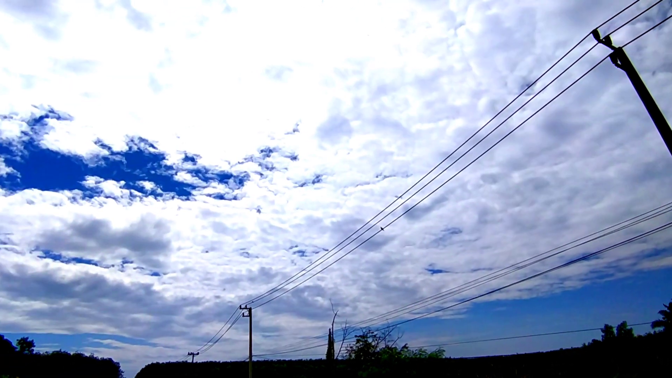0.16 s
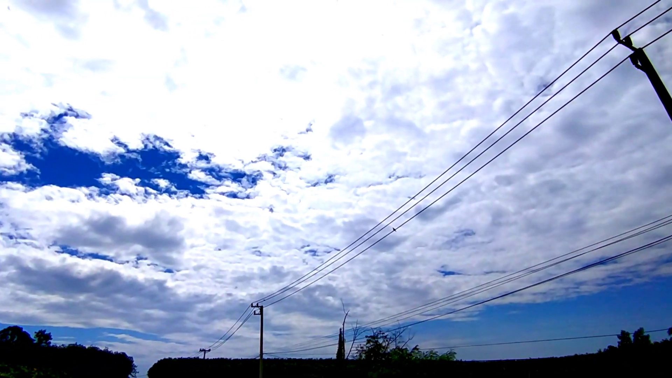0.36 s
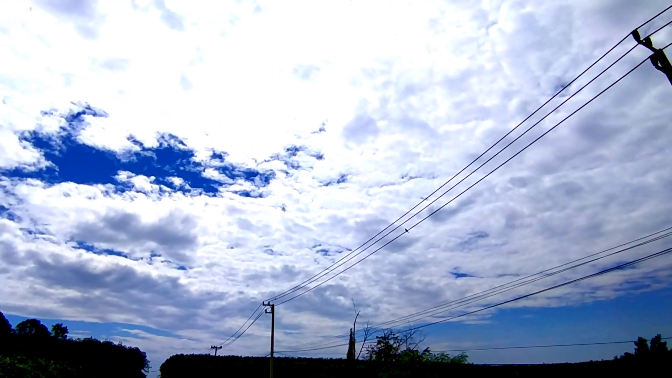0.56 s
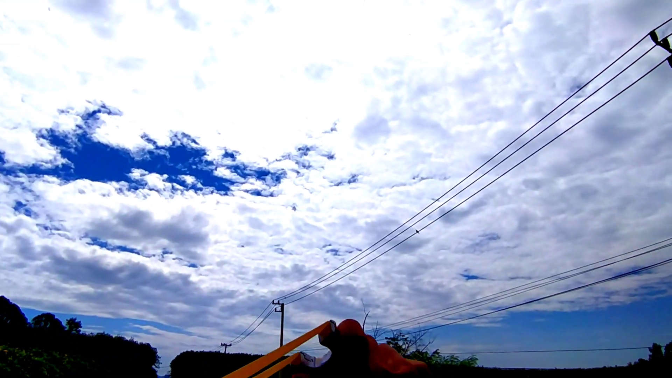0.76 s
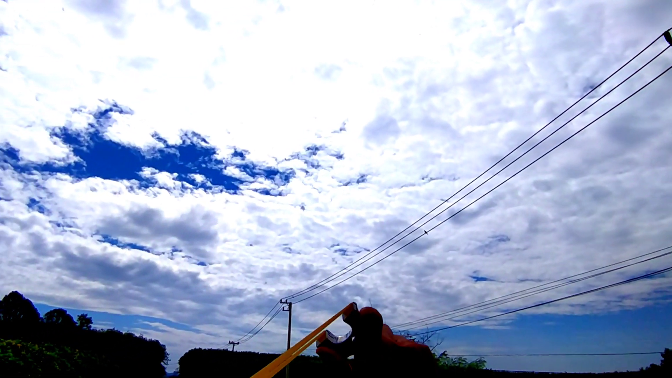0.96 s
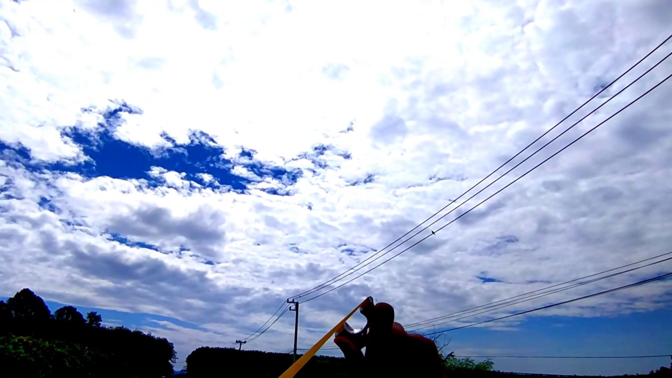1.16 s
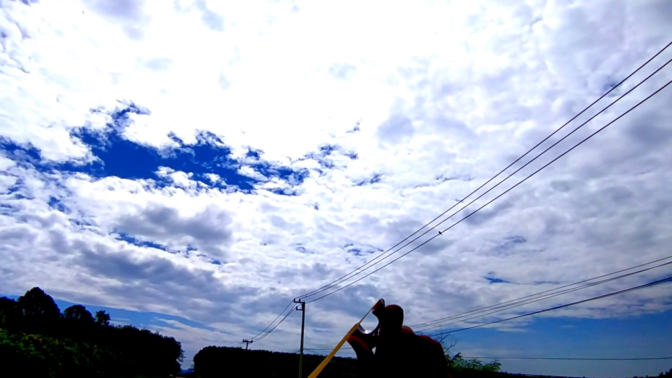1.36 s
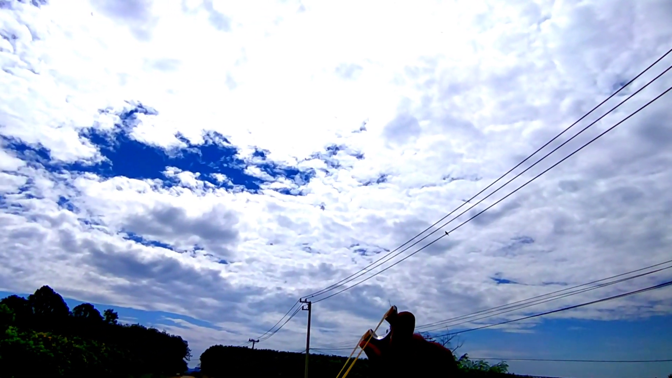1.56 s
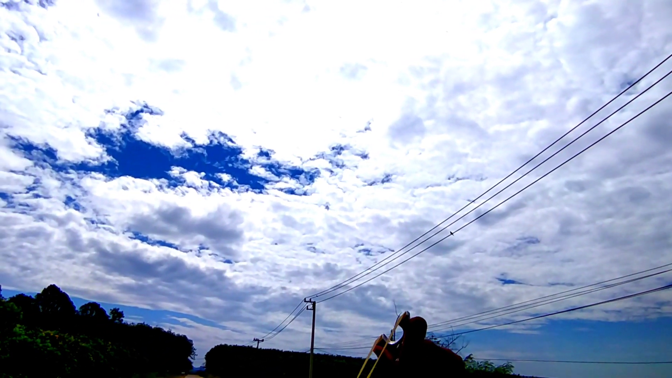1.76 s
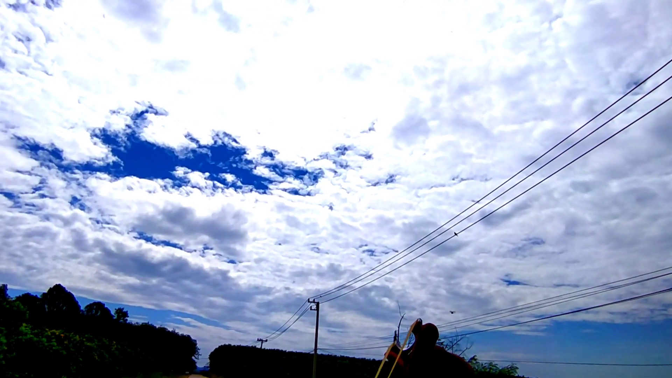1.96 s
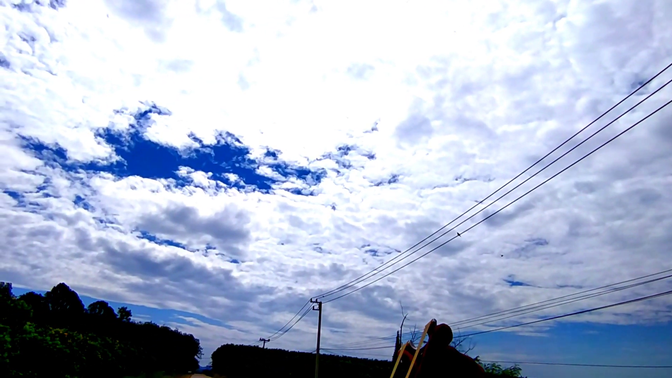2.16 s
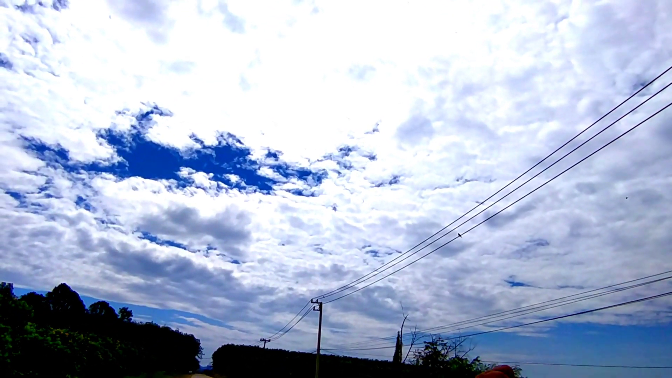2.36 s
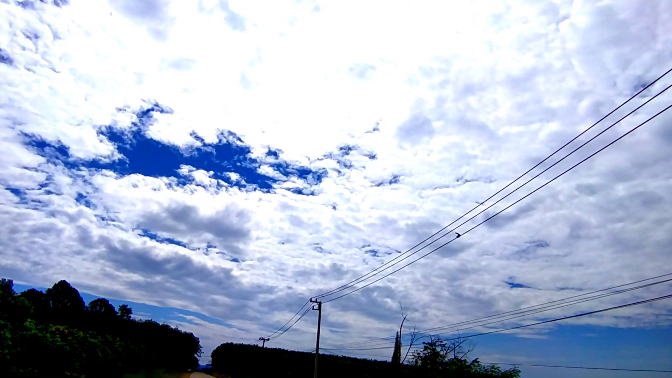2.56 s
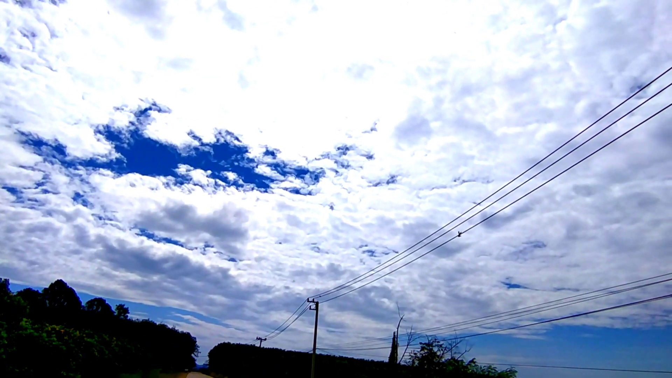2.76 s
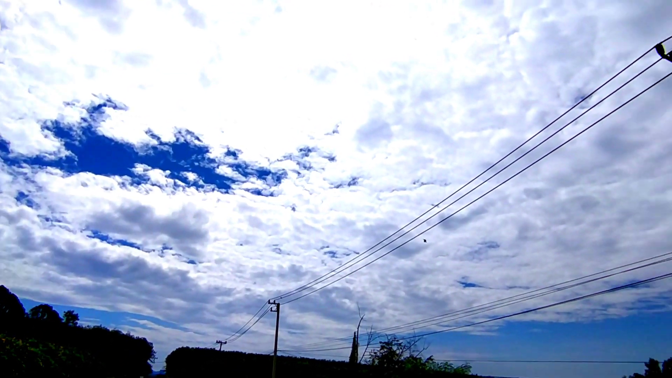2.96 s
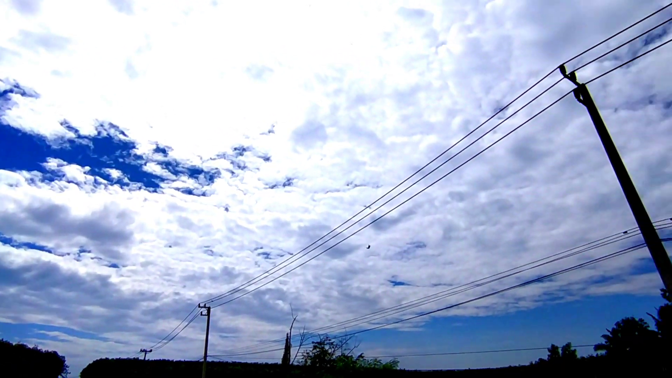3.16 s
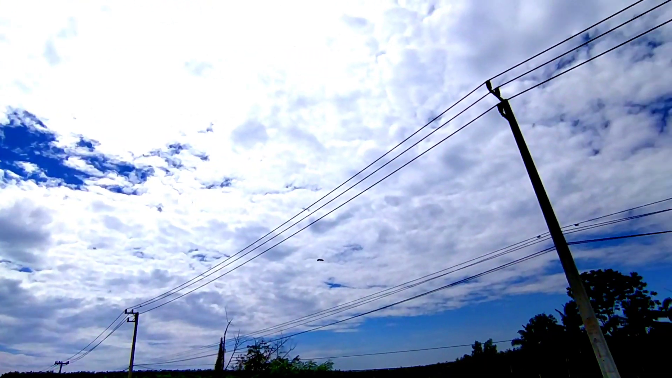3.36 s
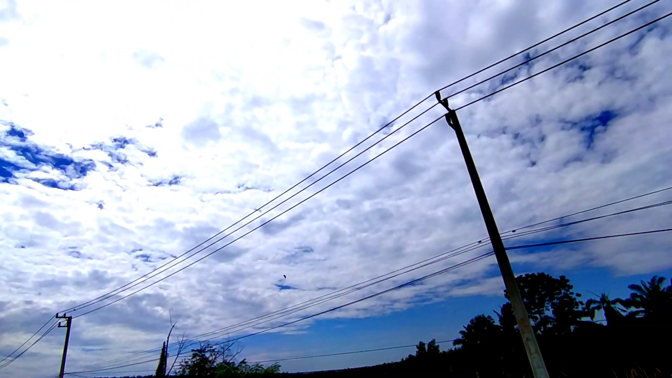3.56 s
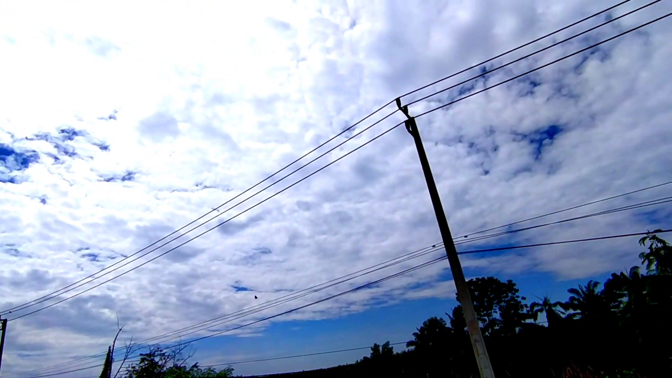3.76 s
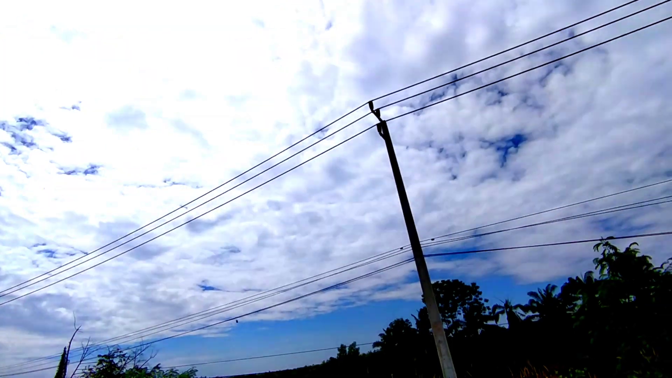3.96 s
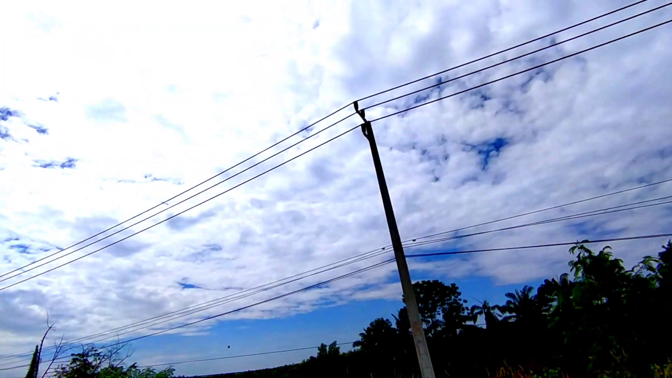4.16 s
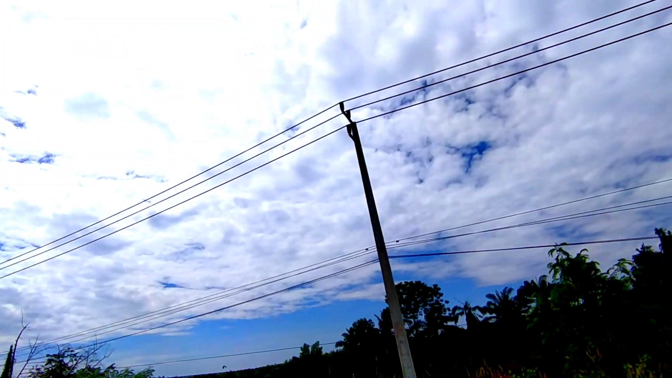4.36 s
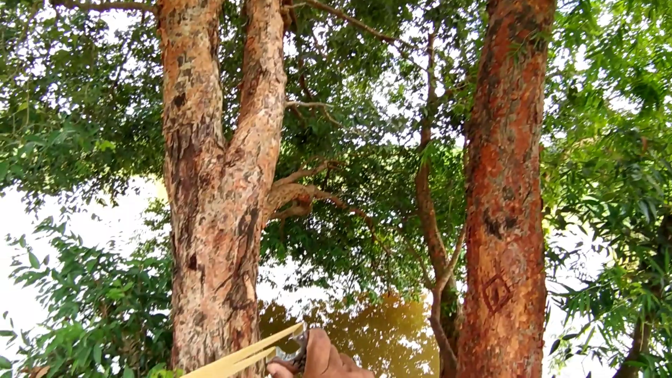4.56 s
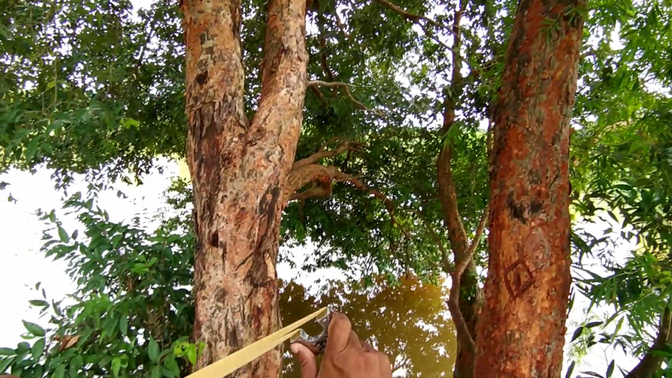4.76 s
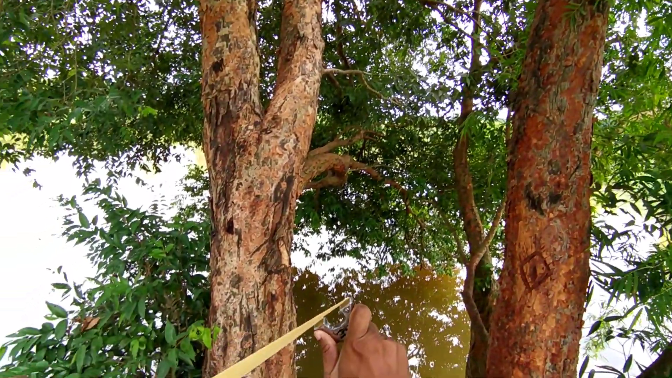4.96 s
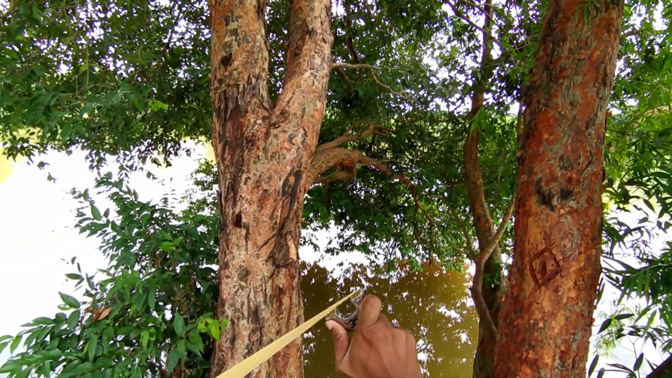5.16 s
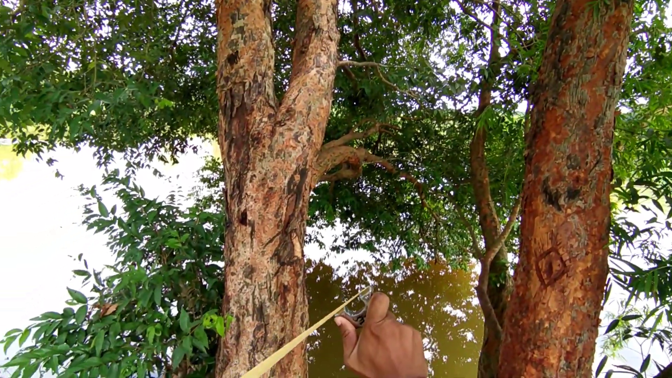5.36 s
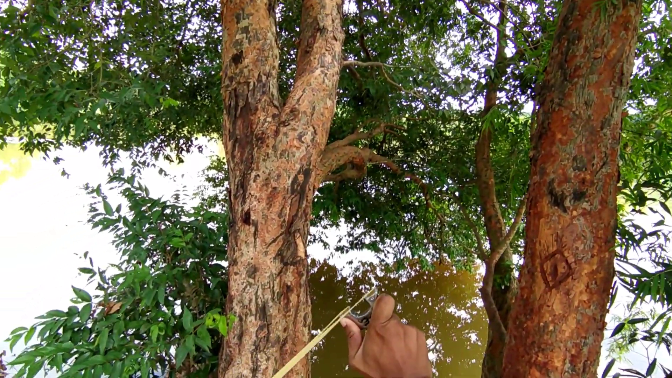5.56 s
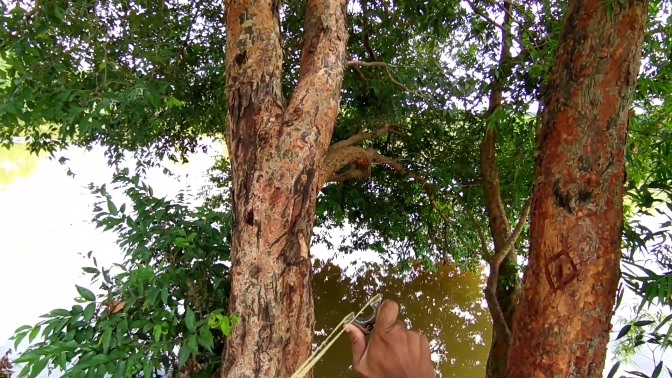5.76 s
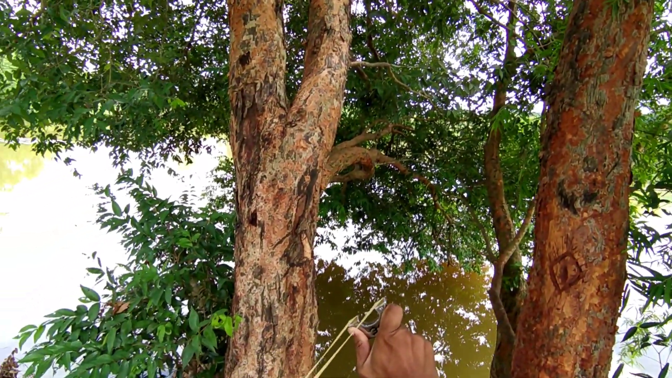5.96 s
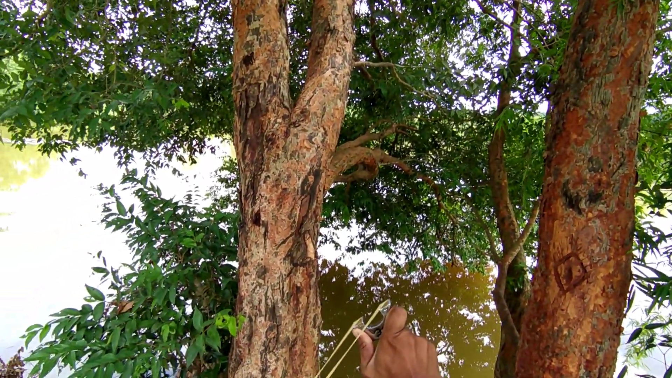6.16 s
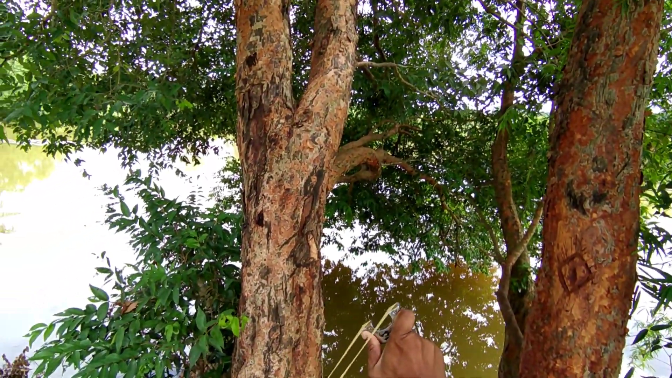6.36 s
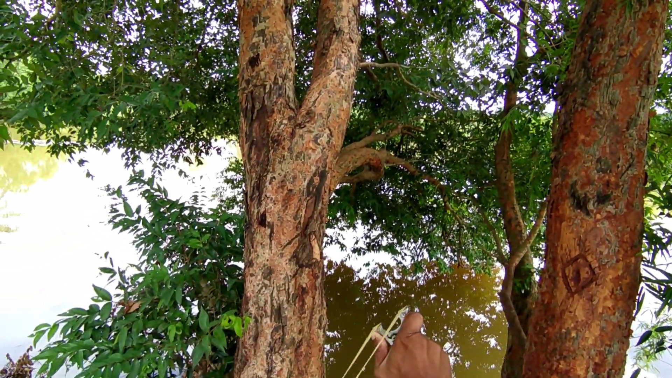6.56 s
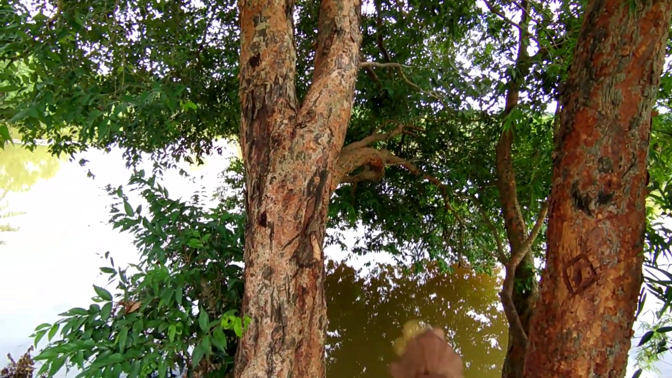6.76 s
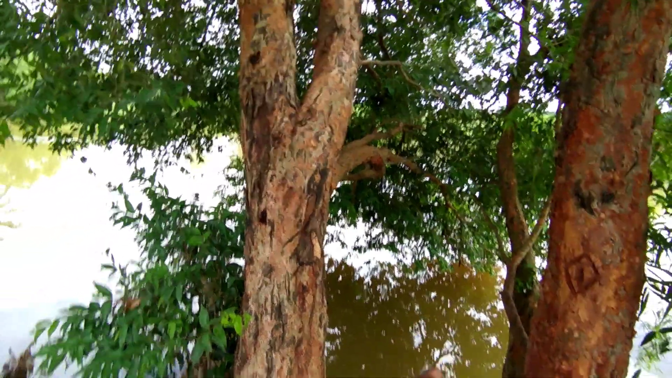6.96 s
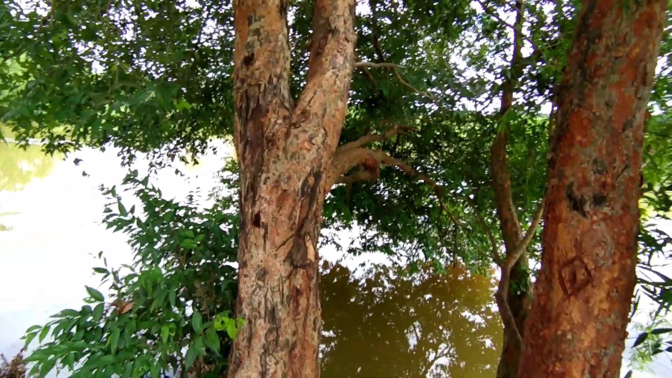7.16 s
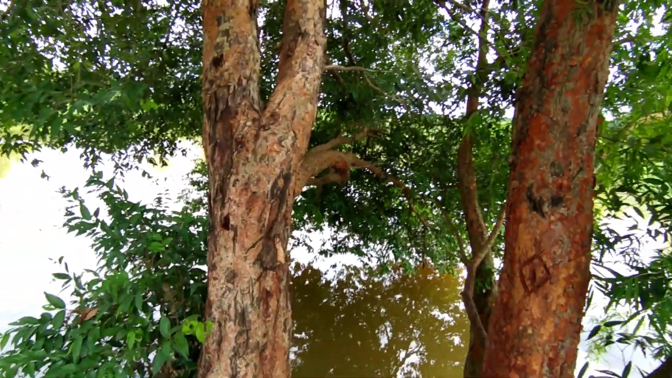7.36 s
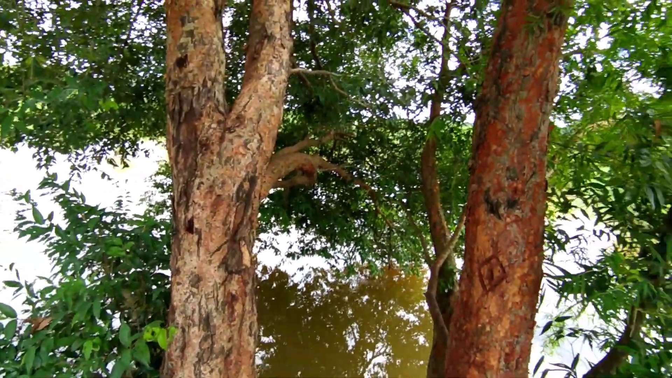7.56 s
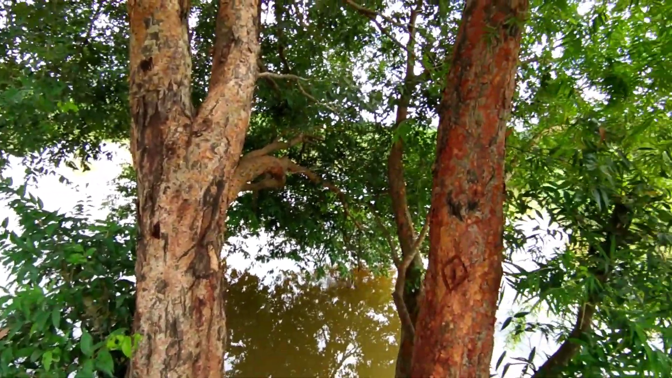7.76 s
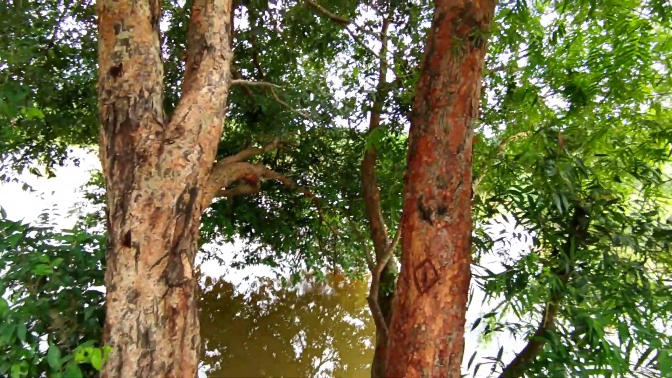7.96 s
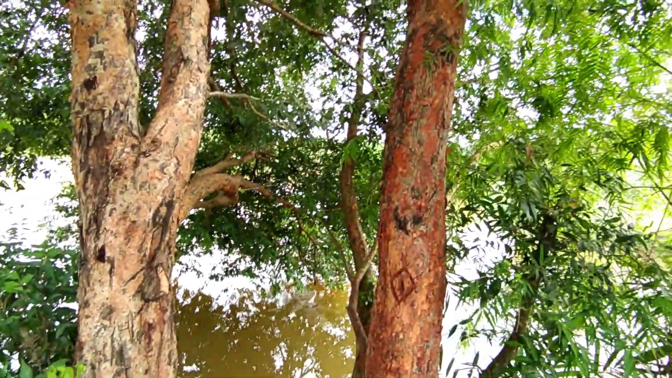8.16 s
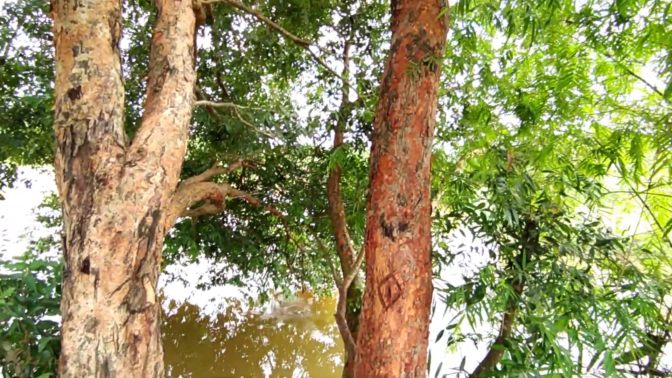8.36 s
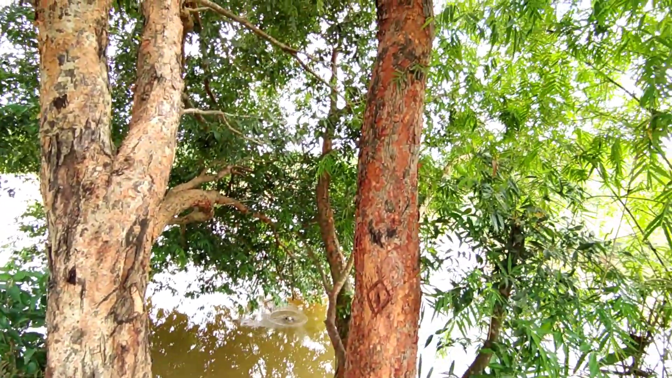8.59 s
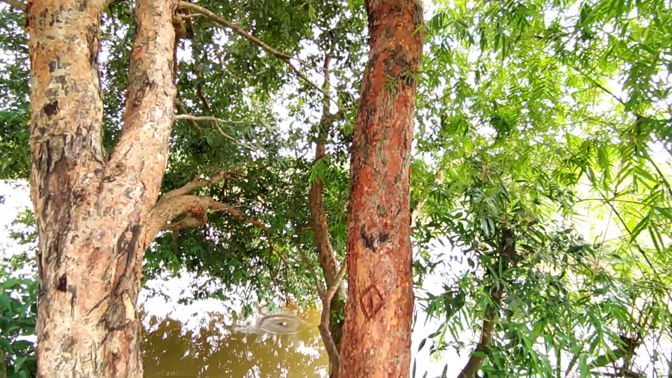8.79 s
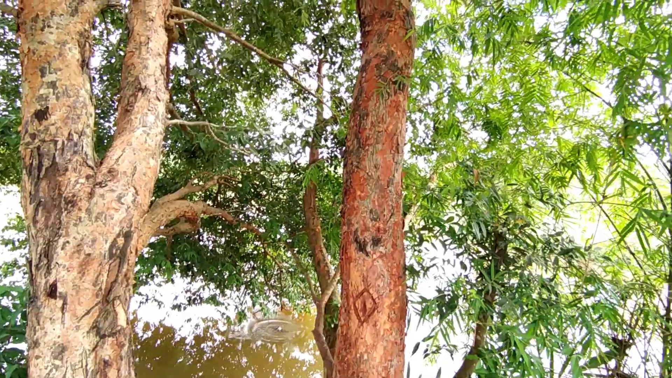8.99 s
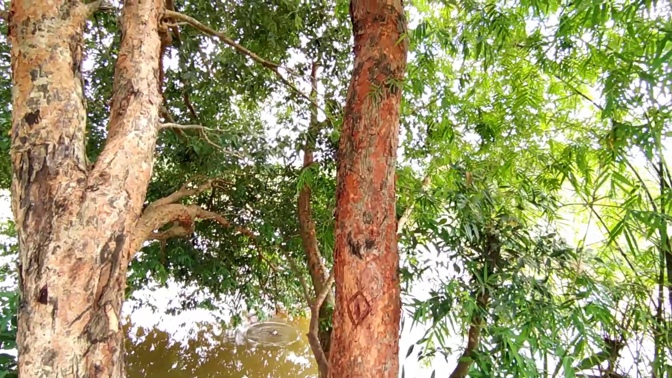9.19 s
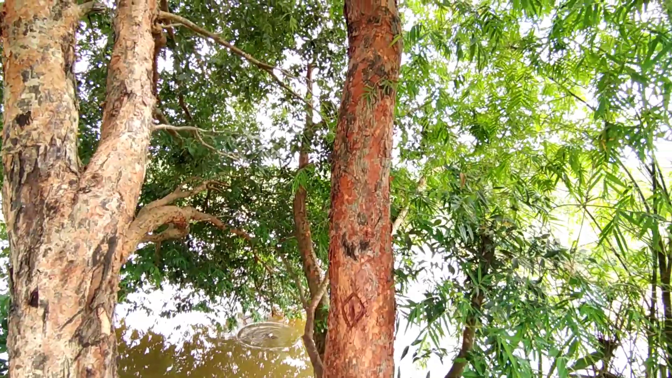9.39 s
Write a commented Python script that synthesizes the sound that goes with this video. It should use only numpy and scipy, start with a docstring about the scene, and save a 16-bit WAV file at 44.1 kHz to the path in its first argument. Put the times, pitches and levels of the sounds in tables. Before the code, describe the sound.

Outdoors in an open field, a single-cylinder engine thumps loudly about twelve times a second, with metallic clatter. A slingshot beside the microphone cracks and slaps, buffeting it with air, and dry ticks trail away. The engine cuts off abruptly. In the quiet by a tree-lined pond a bird calls faintly, then a second snap echoes off trunks, a hard water smack follows, and small drops plop.

```python
"""Slingshot shots by an engine and a pond

Two outdoor shots: a single-cylinder engine chugs close by during the first, then cuts off; the second hits a pond.
Each is noise bursts for release, rush, crack, flap and pouch slap, with a gust and a short low ring falling in pitch.
The engine is gas pulses through a ringing pipe plus near-repeating casing noise; the bird is gliding harmonics.
Grainy noise makes the water's splashes, decaying sines its bubbles; ticks, rustles, soft air and echoes surround them.
"""
import sys
import numpy as np
from scipy import signal
from scipy.fft import rfft, irfft
from scipy.io import wavfile
from scipy.ndimage import uniform_filter1d

SR = 44100
rng = np.random.default_rng(int(sys.argv[2]) if len(sys.argv) > 2 else 0)


def transcribe(signal):
    """Save signal, clipped to [-1, 1], as a 16-bit WAV file at the path in sys.argv[1]."""
    frames = np.atleast_2d(signal).T
    limited = np.clip(frames, -1, 1)
    pcm = np.round(limited * 32767).astype(np.int16)
    wavfile.write(sys.argv[1], SR, pcm)


N = 415863
T = np.arange(N) / SR
HZ = np.fft.rfftfreq(N, 1 / SR)
SILENT_S = 4.745  # the engine is gone from here on

# the two shots: start_s, release_db, release_left_right_db, rush_db, crack_db, flap_db, slap_db, slap_decay_s,
# gust_db, pressure_db, low_ring_db, gust_left_right_db
SHOTS = [(2.6433, -15, 5, -20, -6, -19.5, -7, 0.0031, -9, -6, -21, 3),
         (7.1981, -20.5, 7.5, -27.5, -10, -22, -23.5, 0.003, -15.5, -14.5, -20, 11.5)]
# bright colour of snapping rubber and of spray: frequency_hz, relative_db
BRIGHT = [(1500, -21), (3000, -9.5), (4200, -8), (7500, -1), (9300, 1.5), (11500, -5), (13000, -11.5),
          (15000, -16.5)]
# dull colour of a splash's body and of a drop's tap: frequency_hz, relative_db
PLOP = [(150, -11), (450, 1.5), (950, -7.5), (1600, -6), (2800, -4), (5000, -11), (9000, -18)]


def amp(db):
    """Decibels to gain."""
    return 10 ** (np.asarray(db) / 20)


def unit(x):
    """Scales to rms 1."""
    return x / np.sqrt(np.mean(x ** 2) + 1e-20)


def read(points, hz):
    """Reads a spectrum on a log-frequency axis."""
    f, value = np.transpose(points)
    return np.interp(np.log(hz + 1), np.log(f + 1), value)


def add(mix, s, sound):
    """Mixes a sound in at time s."""
    part = mix[..., max(round(s * SR), 0):][..., :sound.shape[-1]]
    part += sound[..., :part.shape[-1]]


def pan(db):
    """Left and right gains for a level difference; positive is left."""
    return amp([[db / 2], [-db / 2]])


def peaks_db(modes):
    """Lift of a set of resonances at every frequency."""
    return sum(db / (1 + (2 * (HZ - hz) / width) ** 2) for hz, width, db in modes)


def high_pass(order, hz):
    """Butterworth sections that take away the bass."""
    return signal.butter(order, hz, "high", fs=SR, output="sos")


def spread(two, colour_db, side):
    """Colours two signals and uses them as the middle and the sides of a stereo field."""
    z = rfft(two) * amp(colour_db)
    mid = irfft(z[0], N)
    wide = irfft(z[1] * amp(read(side, HZ)), N)
    return np.array([mid + wide, mid - wide]) / np.std(mid)


def burst(colour, rise, decay, wide_hz=1500, size=16384):
    """Coloured noise that swells and dies; mainly its treble differs between the ears."""
    t, hz = np.arange(size) / SR, np.fft.rfftfreq(size, 1 / SR)
    z = rfft(rng.standard_normal((2, size))) * amp(read(colour, hz))
    mid = irfft(z[0])
    wide = irfft(z[1] * hz / (hz + wide_hz))
    shape = np.minimum(t / rise, 1) * np.exp(-np.maximum(t - rise, 0) / decay)
    return np.array([mid + wide, mid - wide]) / np.std(mid) * shape


def ragged(db, grain_s, size):
    """A gain of rms 1 that breaks a sound into grains."""
    grains = uniform_filter1d(rng.standard_normal(size), max(round(grain_s * SR), 1))
    return unit(amp(db * unit(grains)))


def firings(uneven_db=1.0):
    """Times and fuel (dB) of the firings, and the phase of the cycle at every sample."""
    # engine speed, held from each time on: start_s, firings_per_s
    speed = [(.05, 12.05), (.465, 11.93), (1.052, 11.59), (1.397, 11.86), (1.903, 11.64), (2.848, 11.74),
             (3.785, 11.95), (4.036, 11.71)]
    # spells in which the hunting governor starves every second firing: first_s, last_s, deepest_db
    hunts = [(.22, .72, -8), (1.14, 1.65, -9.5), (2.93, 3.27, -5.5), (4.04, 4.21, -7), (4.46, 4.63, -7)]
    start, rate = np.transpose(speed)
    turns = np.cumsum(rate[np.maximum(np.searchsorted(start, T) - 1, 0)]) / SR
    turns -= np.interp(start[0], T, turns)  # a firing falls on the first listed time
    times = np.interp(np.arange(turns[-1]), turns, T)
    fuel_db = uneven_db * rng.standard_normal(len(times))
    for first, last, db in hunts:
        lean = np.arange(np.argmin(abs(times - first)), np.argmin(abs(times - last)) + 1, 2)
        fuel_db[lean] += db * np.sin(np.pi * np.arange(1, len(lean) + 1) / (len(lean) + 1))
    running = times < SILENT_S
    return times[running], fuel_db[running], turns % 1


def exhaust(times, fuel_db, low_hz=32, wobble=0.052):
    """Each firing pushes out unevenly spaced gas pulses; the open pipe rings and radiates no steady flow."""
    # gas pulses of one cycle: after_exhaust_opens_s, relative_db, half_width_s, share_following_fuel (0-1)
    puffs = [(-.0108, -31.5, 0.00088, 0.4), (0, -17.5, 0.0016, 1.), (0.0176, -21, 0.0051, .6),
             (.039, -33.5, 0.0039, 0.7)]
    # resonances of the exhaust pipe: frequency_hz, width_hz, relative_db
    pipe = [(46, 20, -3), (103, 64, -3.5)]
    flow, t = np.zeros(N), np.arange(-900, 900) / SR
    for s, fuel in zip(times, fuel_db):
        for (delay, db, width, share), chance in zip(puffs, rng.standard_normal(len(puffs))):
            pulse = amp(db + share * fuel) * np.exp(-(t / width) ** 2)
            add(flow, s + delay * (1 + wobble * chance) + t[0], pulse)
    ringing = sum(amp(db) * signal.lfilter(*signal.iirpeak(hz, hz / width, SR), flow)
                  for hz, width, db in pipe)
    return signal.sosfiltfilt(high_pass(1, low_hz), flow + ringing)


def clatter(times, phase, treble_db, alike=0.59, throb_db=0.83, hiss_throb_db=1.6, grain_db=1.5, size=3750):
    """Gears and valves strike the casing in nearly the same order every cycle; gas hisses as the exhaust opens."""
    # overall colour of the mechanical noise: frequency_hz, relative_db
    colour = [(25, -9.5), (70, -4), (130, -1.5), (185, -5), (220, -13), (337, -5.5), (412, -7.5),
              (543, -6.5), (690, -15.5), (1200, -12), (2500, -24), (5200, -35), (8000, -30.5), (11500, -35),
              (15000, -50)]
    # ringing of the casing and panels: frequency_hz, width_hz, lift_db
    casing = [(178, 15, 5.5), (178, 13, 4.5), (275.5, 37, 8), (346, 61, 7.5), (550.4, 81, 4.5),
              (768.7, 65, 10.5), (912.7, 61, 7), (980, 50, 2), (1156, 70, 1), (1420, 20, 2.5),
              (1562, 31, 6.5), (2770, 110, 2)]
    # stereo width of the engine: frequency_hz, side_to_mid_db
    side = [(60, -17.5), (110, -12.5), (200, -16), (380, -12), (690, -4.5), (1280, -2), (2350, -1.5),
            (4340, 1), (7990, 0.5), (14700, 3.5)]
    pattern, repeated = rng.standard_normal((2, size)), np.zeros((2, N))
    for s in np.r_[0, times]:
        add(repeated, s, pattern)
    share = np.clip(alike, 0, 1) / (1 + (HZ / 1100) ** 2)  # the slow motions repeat best
    grains = unit(uniform_filter1d(rng.standard_normal(N), size=130))
    fresh = unit(rng.standard_normal((2, N)) * amp(grain_db * grains))
    drive = irfft(rfft(repeated) * np.sqrt(share) + rfft(fresh) * np.sqrt(1 - share), N)
    less_bass_db = -3 / (1 + (HZ / 900) ** 2)
    sound = spread(drive, read(colour, HZ) + peaks_db(casing) + less_bass_db, side)
    hiss = irfft(rfft(sound) / (1 + (3000 / (HZ + 1)) ** 4), N)  # the part above about 3 kHz
    throb = np.cos(2 * np.pi * (phase - .04))  # strongest just after each firing
    return (sound - hiss) * amp(throb_db * throb) + hiss * amp(treble_db + hiss_throb_db * throb)


def drift(x, patchy_db=2.25, patch_hz=130, patch_s=0.4):
    """Narrow bands slowly swell and sink, so the colour never sits still."""
    z = signal.stft(x, SR, nperseg=2048)[2]
    bins = max(round(patch_hz * z.shape[1] / (SR / 2)), 1)
    frames = max(round(patch_s * z.shape[2] / T[-1]), 1)
    field = uniform_filter1d(rng.standard_normal(z.shape), bins, axis=1)
    field = uniform_filter1d(field, frames, axis=2)
    return signal.istft(z * amp(patchy_db * unit(field)), SR)[1][:, :N]


def engine(exhaust_db=-0.5, clatter_db=-36.5, cut_s=4.629, cut_db_per_s=177):
    """Exhaust thumps and casing clatter hold one overall gain, then fade fast and are gone."""
    # level and direction of the engine's treble: time_s, treble_db, left_right_db
    hiss_path = [(0, 3.5, -6.5), (0.749, 3.5, -2.5), (1.2, 0.5, -4.5), (2.4, .5, 1), (4.6, 0, 3)]
    times, fuel_db, phase = firings()
    level = amp(-cut_db_per_s * np.maximum(T - cut_s, 0)) * np.clip((SILENT_S - T) / 0.01, 0, 1)
    s, *columns = np.transpose(hiss_path)
    treble_db, side_db = (np.interp(T, s, c) for c in columns)
    both_db = np.array([treble_db + side_db / 2, treble_db - side_db / 2])
    casing = drift(clatter(times, phase, both_db))
    return level * (amp(exhaust_db) * exhaust(times, fuel_db) + amp(clatter_db) * casing)


def air(level_db=-56):
    """Low rumble, a faint steady low hum and soft hiss: steady coloured noise all through."""
    # colour of the open air: frequency_hz, relative_db
    colour = [(20, -3), (45, -1.5), (90, -3.5), (120, -16), (160, -14), (220, -17), (350, -18.5),
              (500, -19.5), (790, -24.5), (1500, -30.5), (3350, -36.5), (6000, -40), (7800, -35),
              (9200, -42), (11000, -37.5), (12500, -41.5), (15000, -41.5)]
    # narrow bands that stand out: frequency_hz, width_hz, lift_db
    bands = [(88.8, 31, 2), (156.9, 14, 9), (1550, 180, -0.5), (4710, 310, 6.5)]
    # stereo width of the air: frequency_hz, side_to_mid_db
    side = [(60, -8), (110, -16.5), (200, -5), (380, -4), (690, 1), (1280, 2), (2350, 0), (4340, 0.5),
            (7990, 0.5), (14700, 2)]
    return amp(level_db) * spread(rng.standard_normal((2, N)), read(colour, HZ) + peaks_db(bands), side)


def ticks():
    """Sharp clicks (noise) and knocks (decaying sine); a run of dry ticks slows and fades out."""
    # single sharp clicks, of loose gear and, just after the first shot, of the pouch knocking back against the
    # fork: start_s, click_peak_db (rough), knock_db, knock_hz, left_right_db
    clicks = [(0.516, -27, -35, 2595, -13), (2.8107, -19.5, -24, 2480, -10), (2.9708, -18.5, -22, 5630, -2),
              (2.9745, -28, -32, 5300, -2), (7.589, -48, -62, 5500, 6), (7.8163, -47, -68, 5500, 10),
              (7.8695, -48, -66, 5500, 6), (7.8853, -39, -60, 5500, 10), (8.1335, -40, -50, 2870, 10),
              (8.146, -47, -60, 2870, 6), (8.422, -33, -44, 5000, -3)]
    # colour of those clicks: frequency_hz, relative_db
    click_colour = [(1000, -18), (2600, -3), (4000, -4.5), (6500, 0), (11000, 3), (15000, -9)]
    # the run of ticks: start_s, level_db
    run = [(3.186, -44), (3.2873, -38), (3.3667, -35), (3.446, -38), (3.5286, -34), (3.611, -33.5),
           (3.6982, -40), (3.782, -36), (3.8733, -37.5), (3.965, -35.5), (4.0548, -39.5), (4.1463, -38),
           (4.2408, -42)]
    # colour of those ticks: frequency_hz, relative_db
    tick_colour = [(1000, -19), (2600, 2), (4000, -11), (6500, -0.5), (11000, 0.5), (13000, -15),
                   (15000, -24)]
    out = np.zeros((2, N))
    for s, db in run:
        add(out, s, pan(-1.5) * amp(db) * burst(tick_colour, rise=0.0017, decay=0.0035))
    t = np.arange(2048) / SR
    for s, db, knock_db, knock_hz, side_db in clicks:
        knock = np.sin(2 * np.pi * knock_hz * t) * np.exp(-t / 0.0013)
        click = burst(click_colour, rise=0.00053, decay=0.001)
        add(out, s, pan(side_db) * amp(db - 6) * click)  # 6 dB from peak to rms
        add(out, s, pan(side_db) * amp(knock_db) * knock)
    return out


def rustles(grain_db=-4.5, side_db=3):
    """Short, thin, grainy swells of noise while the bands are held taut."""
    # faint rustles while aiming: start_s, length_s, level_db
    swells = [(2.058, 0.1, -50), (2.202, 0.1, -48.5), (2.365, 0.07, -48), (2.468, 0.077, -49),
              (5.951, 0.097, -72), (6.15, 0.067, -67.5), (6.576, 0.17, -65), (6.923, 0.067, -66.5),
              (6.957, 0.16, -60)]
    # colour of the rustling: frequency_hz, relative_db
    colour = [(2500, -20), (3300, -12), (3900, 0.5), (4400, -7), (5400, -12), (6700, -15), (8000, -9.5),
              (9500, -22)]
    level = np.zeros(N)
    for s, length, db in swells:
        add(level, s, amp(db) * np.hanning(round(length * SR)))
    noise = rng.standard_normal((2, N)) * ragged(grain_db, .003, N)
    grains = irfft(rfft(noise) * amp(read(colour, HZ)), N)
    return pan(side_db) * level * unit(grains)


def bird(rasp=0.055, flutter_db=9, flutter_s=0.0022, third_db=-13.5):
    """Gliding whistle with octave and third harmonic; jitter and flutter make it raspy; one short hiss apart."""
    # the calls, one list each: time_s, pitch_hz, level_db, roughness (0-1), octave_db
    calls = [
        [(2.232, 2050, -50, .4, -20), (2.256, 1954, -36.5, 0.6, -22), (2.272, 1600, -47, .4, -20),
         (2.285, 1470, -56, 0.5, -20)],
        [(4.85, 3720, -83, 0.02, -19.5), (4.885, 3720, -61, 0, 5), (4.935, 3770, -59, 0, -4),
         (4.955, 3400, -64, 0.73, -1), (4.975, 2740, -54, 0.6, -20), (5.01, 2503, -57, 0.65, -28),
         (5.055, 2225, -58, 0.62, -26), (5.087, 1950, -68, .6, -24)],
        [(5.585, 1386, -77.5, 0.26, -25), (5.63, 1500, -70, .2, -25), (5.67, 1378, -73, .2, -25)],
    ]
    # a short hiss before the second call: frequency_hz, relative_db
    hiss_colour = [(2000, -22), (3400, -3), (4400, -21), (5800, -17), (7200, 5), (9000, -17), (11000, -6),
                   (14000, -17)]
    out = np.zeros((2, N))
    for call in calls:
        s, *columns = np.transpose(call)
        t = np.arange(s[0], s[-1], 1 / SR)
        hz, db, rough, octave_db = (np.interp(t, s, c) for c in columns)
        jitter = unit(uniform_filter1d(rng.standard_normal(len(t)), size=40))
        angle = 2 * np.pi * np.cumsum(hz * (1 + rasp * rough * jitter)) / SR
        overtones = np.sin(2 * angle) + amp(third_db) * np.sin(3 * angle)  # third set against the octave
        tone = np.sin(angle) + amp(octave_db) * overtones
        add(out, s[0], pan(3.3) * amp(db) * tone * ragged(flutter_db * rough, flutter_s, len(t)))
    add(out, 4.2, amp(-56.5) * burst(hiss_colour, rise=.012, decay=0.054))
    return out


def snap(db, body_db, decay, rise=0.0007, grain_db=2.0):
    """Rubber strikes: a bright crack over a duller, longer, ragged body."""
    # colour of the body: frequency_hz, relative_db
    body_colour = [(100, -11), (250, -4), (850, -6.5), (1300, -2), (2000, -4), (2700, -7), (4000, -18),
                   (8000, -32)]
    body = burst(body_colour, 0.0026, 2.0 * decay)
    body = body * ragged(grain_db, 0.0022, body.shape[1])
    return amp(db) * (burst(BRIGHT, rise, decay) + amp(body_db) * body)


def slingshot():
    """The bands are let go, rush forward, crack and flap; then the empty pouch slaps back."""
    out = np.zeros((2, N))
    for s, release_db, release_side_db, rush_db, crack_db, flap_db, slap_db, slap_decay, *_ in SHOTS:
        add(out, s - .0108, pan(release_side_db) * snap(release_db, body_db=-7, decay=0.0011))
        add(out, s - 0.01, pan(0) * snap(rush_db, body_db=-6.5, decay=0.0056, rise=0.0058))
        add(out, s, pan(-5) * snap(crack_db, body_db=-7, decay=0.0017))
        add(out, s + .0105, pan(1.5) * snap(flap_db, body_db=2, decay=0.0027))
        add(out, s + .0232, pan(-3.5) * snap(slap_db, body_db=-12.5, decay=slap_decay, rise=0.00079))
    return out


def gusts(lag=.002, rise=0.0044, decay=0.011, swing_hz=4.1, settle=0.14, ring_hz=180,
          fall_share=0.27, fall_s=.045, ring_decay=0.02, grain_db=2):
    """The pouch's wake buffets each port, whose pressure swings slowly back; a short low ring falls in pitch."""
    # colour of the wake on the microphone: frequency_hz, relative_db
    colour = [(30, -6.5), (90, -9.5), (125, -10.5), (185, 8), (300, -2), (500, -0.5), (750, -3.5),
              (1100, -5.5), (1900, -11), (4000, -30.5)]
    out, t = np.zeros((2, N)), np.arange(SR) / SR
    turns = np.cumsum(ring_hz * (1 - fall_share * (1 - np.exp(-t / fall_s)))) / SR
    ring = np.sin(2 * np.pi * turns) * np.exp(-t / ring_decay)
    swing_turns = swing_hz * settle * 1.6 * (1 - np.exp(-t / settle))  # the swing slows as it settles
    swing = -np.cos(2 * np.pi * swing_turns) * np.exp(-t / settle)
    push = swing * (1 - np.exp(-t / 0.0021))
    for s, *_, db, push_db, ring_db, side_db in SHOTS:
        wake = burst(colour, rise, decay, wide_hz=250)
        add(out, s + lag, pan(side_db) * amp(db) * wake * ragged(grain_db, 0.0042, wake.shape[1]))
        add(out, s + lag + 0.0047, pan(0.65 * side_db) * amp(push_db) * push)
        add(out, s + lag + 0.0036, pan(0.65 * side_db) * amp(ring_db) * ring)
    return out


def scatter(x, share=1, grain_db=4.5, onset=0.0067, far_db=-19, far_t60_s=.8):
    """A crackly tail of small echoes and a faint late far-bank return, different at each ear; share scales its length."""
    # scatter from ground and leaves: frequency_hz, t60_s at share 1
    tail_t60 = [(150, .07), (1000, 0.068), (3000, 0.13), (5000, 0.25), (8000, 0.32), (11000, 0.36),
                (14000, 0.25)]
    grains = np.array([ragged(grain_db, 0.0024, SR) for _ in range(2)])
    echoes = rng.standard_normal((2, SR)) * grains
    hz, t, z = signal.stft(echoes, SR, nperseg=256)
    near = amp(-60 * t / (share * read(tail_t60, hz)[:, None]))
    far = amp(far_db - 60 * t / (share * far_t60_s))
    tail = signal.istft(z * (near + far) * np.minimum(t / onset, 1), SR, nperseg=256)[1]
    return signal.fftconvolve(x, tail / np.linalg.norm(tail[0]), axes=1)[:, :N]


def trunks(x, low_hz=1200):
    """Near trunks throw back separate echoes of the treble."""
    # echoes from the nearest trunks at the pond: delay_s, level_db, left_right_db
    echoes = [(.0045, -15, -12), (.0085, -12, 5), (0.013, -14, 2), (0.019, -11, 3), (.029, -19, -11)]
    out, treble = np.zeros((2, N)), signal.sosfilt(high_pass(1, low_hz), x)
    for delay, db, side_db in echoes:
        add(out, delay, pan(side_db) * amp(db) * treble)
    return out


def bubble(hz, decay, glide=0.225):
    """A pocket of air rings, rising in pitch as it surfaces."""
    t = np.arange(0, 7 * decay, 1 / SR)
    turns = np.cumsum(hz * (1 + glide * np.tanh(t / (3 * decay)))) / SR
    return np.sin(2 * np.pi * turns) * np.exp(-t / decay) * (1 - np.exp(-t / 0.00032))


def splash(spray_db, body_db, rise, decay, grain_db=4.0, plop_db=1, cycles=2.7, count=26):
    """Grainy spray with a scatter of small plops."""
    out = amp(spray_db) * burst(BRIGHT, rise, decay) + amp(body_db) * burst(PLOP, rise, decay)
    out *= ragged(grain_db, 0.0011, out.shape[1])
    for when, pitch, size, side in rng.random((count, 4)):
        hz = 600 * 6 ** pitch
        plop = amp(body_db + plop_db) * size * bubble(hz, cycles / hz)
        add(out, when * (rise + 2 * decay), pan(12 * (side - .5)) * plop)
    return out


def water(strike_rise=0.00074, spray_rise=0.0034, splash_side_db=1):
    """The strike and its spray, later splashes, and drops that tap and ring as bubbles."""
    # the shot strikes the pond and its cavity slaps shut: start_s, treble_db, body_db, decay_s, left_right_db
    strikes = [(7.3127, -19.5, -27.5, .0018, -6), (7.3156, -23.5, -24, .0022, 1)]
    # treble of the strike: frequency_hz, relative_db
    treble_colour = [(3800, -18), (5500, 2), (7000, -1), (9000, 3.5), (11500, -6), (13500, -20),
                     (15000, -30)]
    # body of the strike: frequency_hz, relative_db
    body_colour = [(200, -6), (600, -1), (1600, -1), (2800, -3), (4000, -12), (9000, -27)]
    # later splashes, the longer the softer their start: start_s, spray_db, body_db, decay_s
    splashes = [(7.428, -36, -53, 0.003), (7.451, -60, -51, 0.0052), (7.935, -58.5, -65, 0.023),
                (7.965, -60, -61.5, 0.046), (8.215, -58, -57, 0.014), (8.25, -62.5, -60, 0.029),
                (8.324, -56.5, -58.5, 0.048), (8.695, -56, -60, 0.032), (8.74, -64, -61, 0.082)]
    # bubbles and drops falling back: start_s, starting_pitch_hz, ring_db, decay_s
    bubbles = [(7.454, 870, -37, 0.0057), (7.458, 217, -49, 0.029), (8.009, 673, -58, .005),
               (8.139, 2580, -50, 0.0033), (8.222, 1280, -49, 0.0033), (8.228, 810, -47, .004),
               (8.336, 665, -51, 0.0052), (8.354, 1250, -54, .004), (8.503, 1930, -52.5, 0.0024),
               (8.506, 2640, -51.5, 0.0021), (8.553, 1194, -53, 0.005), (8.632, 3090, -54, 0.0027),
               (8.697, 1270, -49.5, .005), (8.727, 1520, -48, 0.0069), (8.742, 520, -53, 0.0065),
               (8.753, 416, -50, 0.0093), (8.757, 2400, -56, .003), (8.781, 1260, -49, .004),
               (8.786, 2000, -52, .005), (8.864, 2450, -57, .004), (8.903, 2480, -57, .004),
               (8.94, 1730, -60, 0.0046), (9.061, 1580, -55.5, .0035)]
    out = np.zeros((2, N))
    for s, treble_db, body_db, decay, side_db in strikes:
        treble = amp(treble_db) * burst(treble_colour, strike_rise, decay)
        body = amp(body_db) * burst(body_colour, strike_rise, decay)
        add(out, s, pan(side_db) * (treble + body))
    spray = splash(-46, -45.5, spray_rise, decay=0.037, grain_db=3, plop_db=-13)
    add(out, strikes[0][0] + 0.0053, pan(-11) * spray)
    for s, spray_db, body_db, decay in splashes:
        add(out, s, pan(splash_side_db) * splash(spray_db, body_db, 0.73 * decay, decay))
    for s, hz, db, decay in bubbles:
        add(out, s, amp(db) * bubble(hz, decay))
        add(out, s, amp(db - 8.5) * burst(PLOP, .0006, 0.0055))  # wet tap
    return out


def scene():
    """All sources with their echoes; the field's tail is shorter and weaker, and leaves throw back little bass."""
    shots, clicks, pond, calls = slingshot(), ticks(), water(), bird()
    second = shots * (T >= SILENT_S)
    first = shots - second
    wet = scatter(amp(-10) * first + amp(-14) * clicks, share=0.41)  # open field
    wet += scatter(amp(-4) * second + amp(-3.5) * pond + amp(-8) * calls)  # trees at the pond
    wet = signal.sosfilt(high_pass(1, 900), wet)
    direct = engine() + air() + rustles() + gusts() + shots + clicks + pond + calls
    return direct + trunks(second) + pan(5) * wet


def record(dry):
    """The microphone ports colour the treble, the loudest peaks overload the input; then the band limit."""
    # resonance of the left and right microphone port: frequency_hz, width_hz, lift_db
    ports = [(10850, 1400, 8), (11100, 2800, -4.5)]
    heard = irfft(rfft(dry) * amp([peaks_db([port]) for port in ports]), N)
    band_limit = signal.firwin(511, 15400, window=("kaiser", 9), fs=SR)  # cutoff in Hz
    return signal.oaconvolve(np.clip(heard, -1, 1), band_limit[None], "same")


dry = scene()
out = record(dry)
transcribe(out)
```